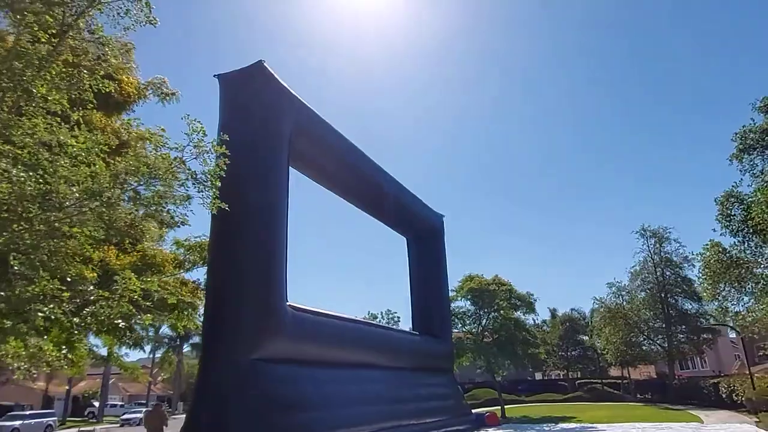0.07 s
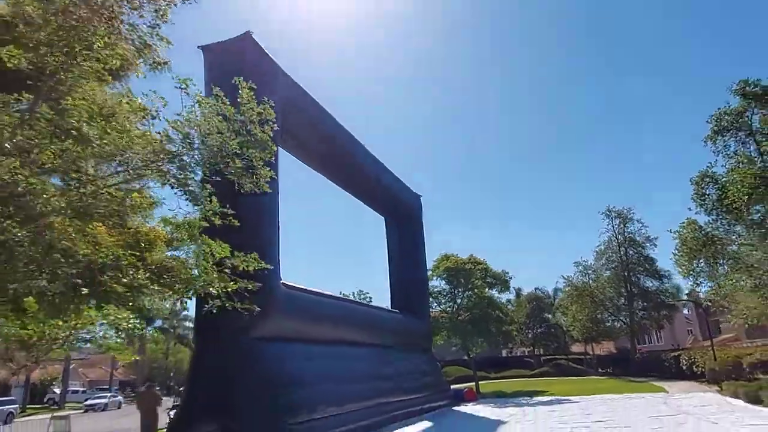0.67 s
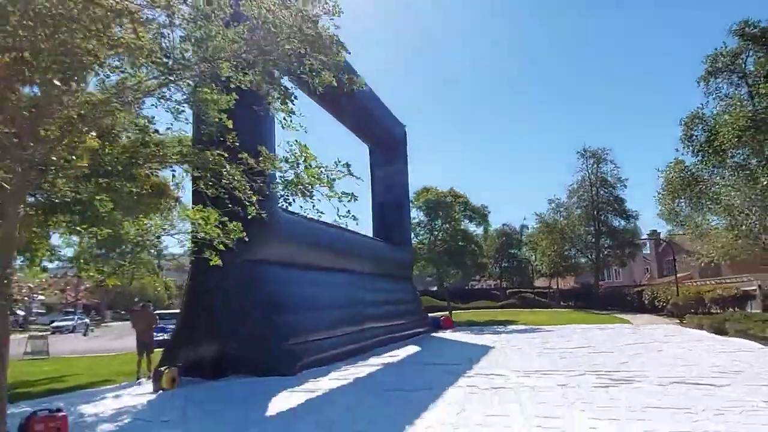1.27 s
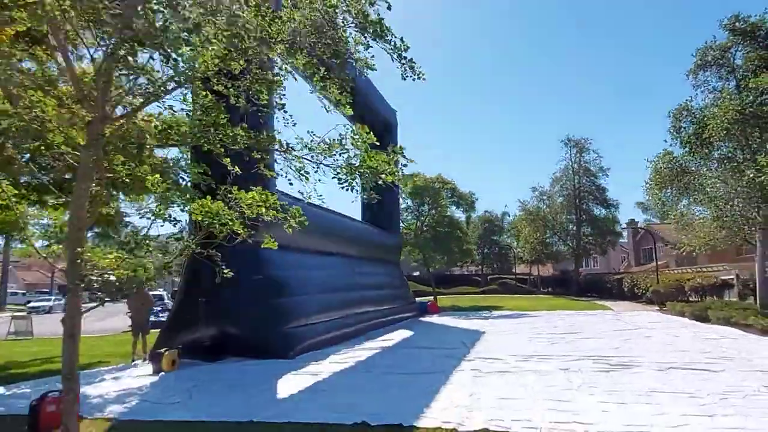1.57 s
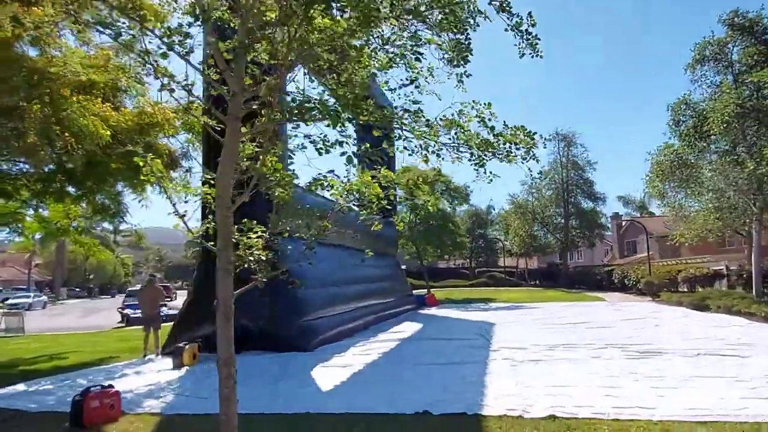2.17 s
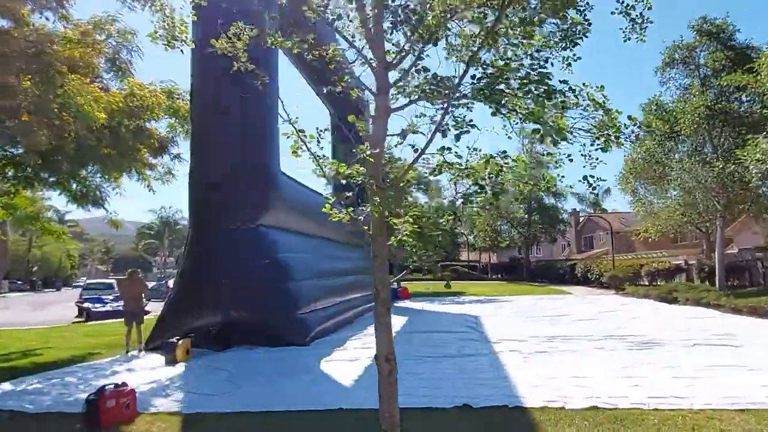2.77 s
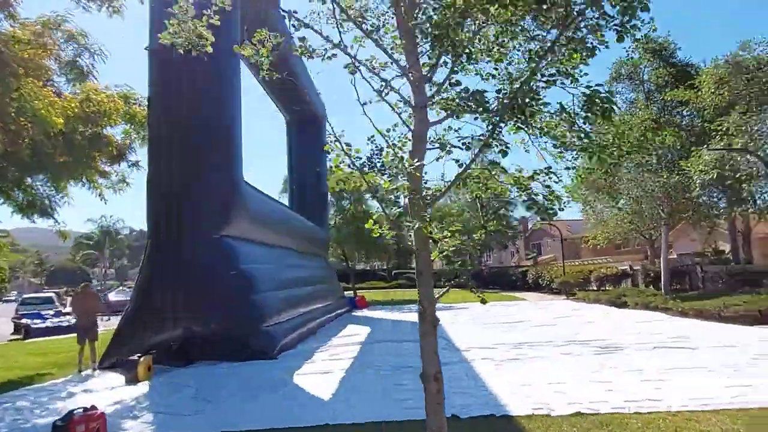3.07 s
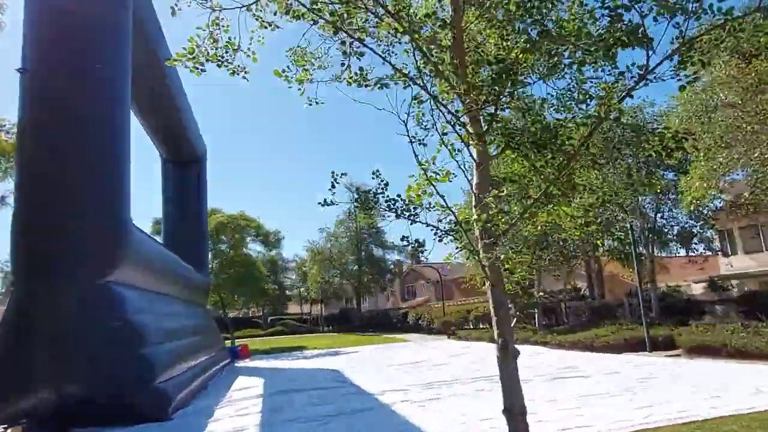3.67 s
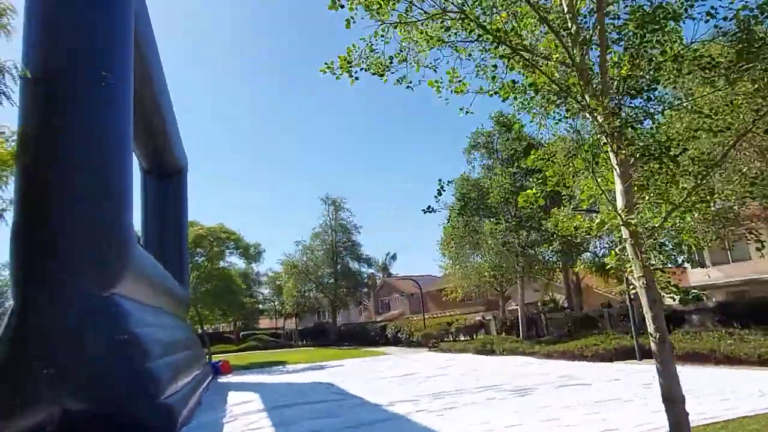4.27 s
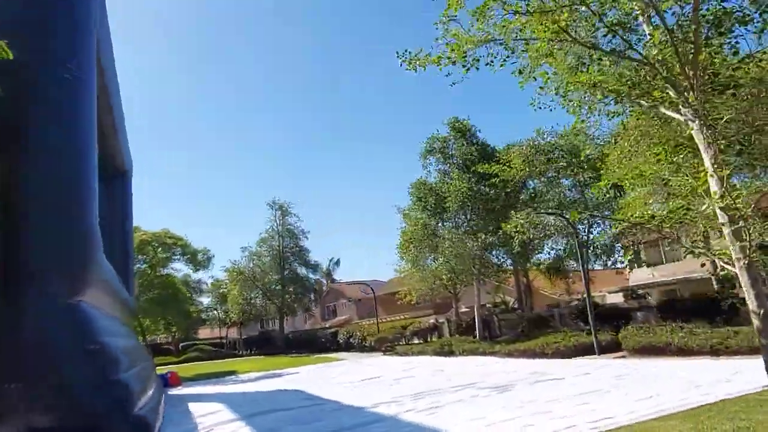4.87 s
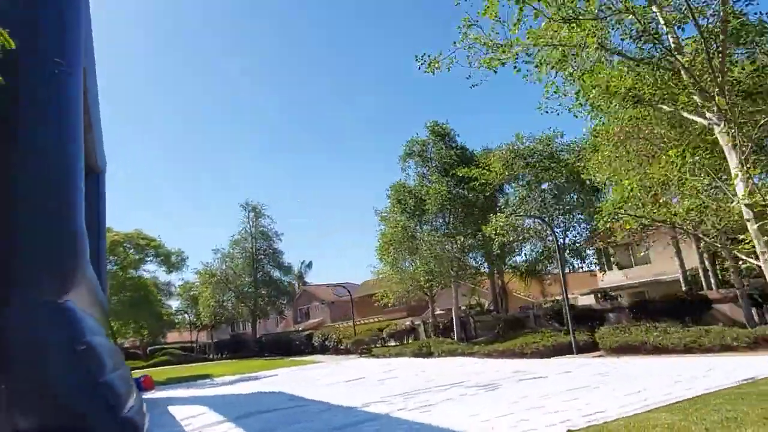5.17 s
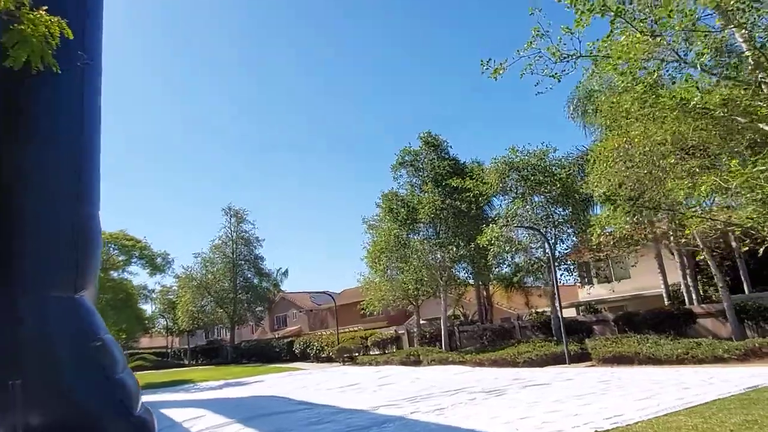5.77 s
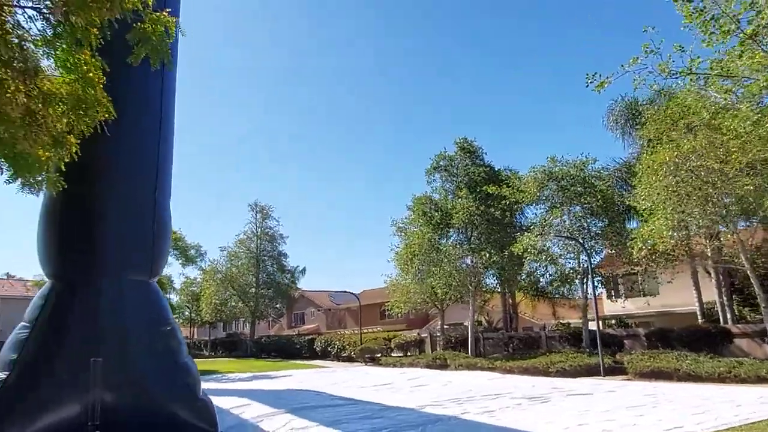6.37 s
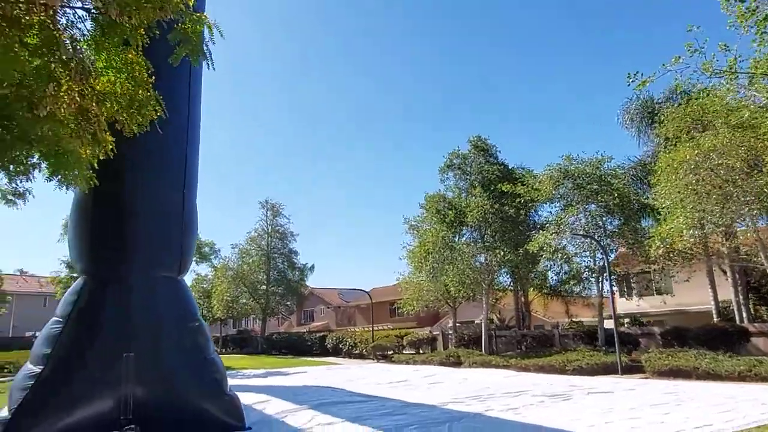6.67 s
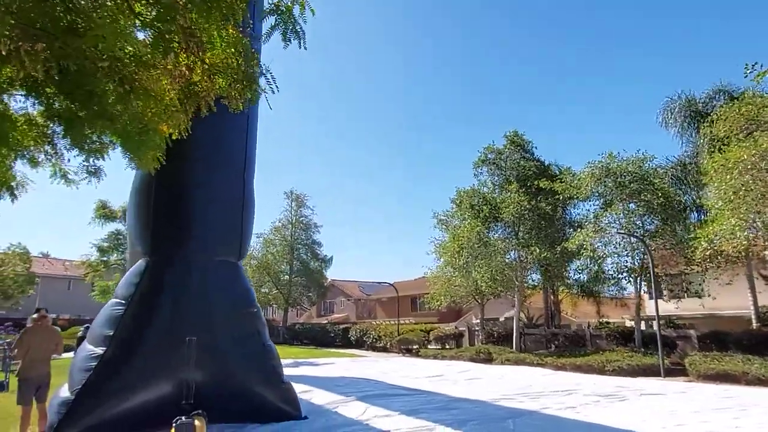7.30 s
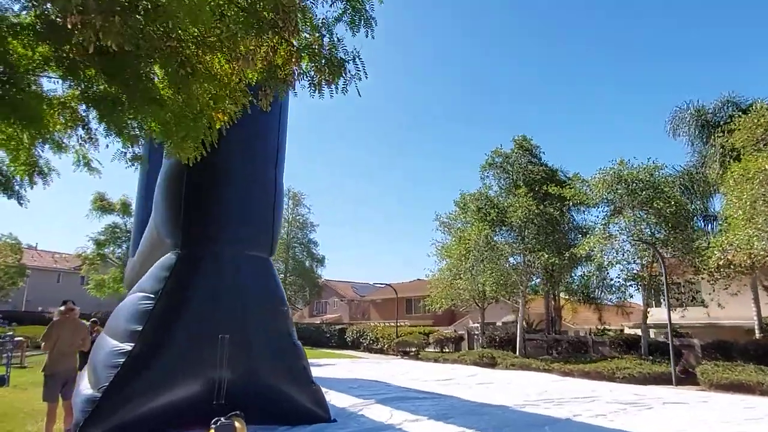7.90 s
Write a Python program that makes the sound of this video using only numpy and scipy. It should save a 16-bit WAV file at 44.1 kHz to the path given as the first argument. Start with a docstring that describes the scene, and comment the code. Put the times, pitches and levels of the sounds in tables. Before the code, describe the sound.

A small petrol generator runs outdoors for the whole eight seconds at a steady speed: a rapid, muffled exhaust thudding that merges into a low drone, with a knocking case, mechanical clatter, a fluttering whine and a thin airy hiss. Beneath it, a more distant electric blower hums and rushes softly. In the first two seconds a light breeze puffs on the microphone, and three faint, dull finger ticks come between about 1.2 and 1.7 seconds. The microphone is carried toward the generator, so the engine gradually grows louder, with a fuller low boom from around 2 seconds. The whine and clatter swell near 4 seconds, a high whistle stands out around 6, and the clatter is brightest near 7. The engine shifts from the left toward the centre late on, and turns a little duller at about 8 seconds while still running.

```python
"""Generator and blower on a lawn

A petrol generator and an electric blower keep a big inflatable screen up. The one-cylinder engine
thuds through its muffler, clatters and whines; further off, the blower's motor hums and its air rushes.
The microphone is carried past the generator, turning and coming closer. At first a breeze bumps
its two ports (the left and right openings) and fingers tick on its case."""
import sys
import numpy as np
from scipy import signal
from scipy.fft import rfft, irfft
from scipy.io import wavfile
from scipy.ndimage import uniform_filter1d, map_coordinates

SR = 44100
rng = np.random.default_rng(int(sys.argv[2]) if len(sys.argv) > 2 else 0)


def store_wav(level_fs):
    """Save 16-bit WAV to argv[1]."""
    pcm = np.round(np.clip(np.atleast_2d(level_fs), -1, 1) * 32767)
    wavfile.write(sys.argv[1], SR, pcm.T.astype(np.int16))


N = 358974
TIME = np.arange(N) / SR
HZ = np.maximum(np.fft.rfftfreq(N, 1 / SR), 1)
FIRING_HZ = 38.81   # usual firings per second; an "order" is a multiple of the firing rate


def from_db(db):
    """Turn decibels into a gain."""
    return 10 ** (np.asarray(db) / 20)


def rms_one(x):
    """Scale x so that its average strength (rms) is 1."""
    return x / np.sqrt(np.mean(x ** 2) + 1e-20)


def in_time(rows):
    """Join a table's rows with straight lines in time: one curve for each further column."""
    times, *columns = np.transpose(rows)
    return [np.interp(TIME, times, column) for column in columns]


def bump(centre_s, half_width_s):
    """A smooth rise and fall of height 1."""
    return np.exp(-((TIME - centre_s) / half_width_s) ** 2)


def drift(rate_hz):
    """A random wander of strength 1 that changes about rate_hz times a second."""
    return rms_one(irfft(rfft(rng.standard_normal(N)) / (1 + (HZ / rate_hz) ** 2), N))


def colour(x, spectrum):
    """Shape the lows and highs of x by a spectrum table; the result has strength 1."""
    hz, db = np.transpose(spectrum)
    gain = from_db(np.interp(np.log(HZ), np.log(hz), db))
    edge_fade = np.minimum(HZ / hz[0], 1) ** 2 * np.minimum(hz[-1] / HZ, 1) ** 2
    return rms_one(irfft(rfft(x) * gain * edge_fade, N))


def at_ports(x, pan_db=0, lead_scale=1):
    """Sound reaches one port before the other as the microphone turns; pan_db is left minus right."""
    # direction of the generator: (time [s], left port's lead before scaling [ms])
    bearing = [(0, .375), (2.7, .38), (3.7, .457), (4.1, .452), (4.5, .42), (5.15, .42), (5.85, .35),
               (6.5, .13), (7.15, .11), (7.6, .055), (8.14, -.04)]
    shift = lead_scale * in_time(bearing)[0] * SR / 2000   # samples, half the lead for each port
    return np.array([map_coordinates(x, [np.arange(N) + side * shift], order=3, mode="nearest")
                     * from_db(side * pan_db / 2) for side in (1, -1)])


def breeze(start_db=-34, fade_db_per_s=2, puff_half_width_s=0.031):
    """A dying wind puffs on each port a little differently, over the hush of trees and street."""
    # the distant hush: (frequency [Hz], relative level [dB])
    hush_spectrum = [(30, -20), (80, -27), (250, 8.5), (600, 6.5), (1200, 5.5), (2400, 3.5), (4000, 1.5),
                     (8000, -4.5), (12000, -21), (16000, -22)]
    # puffs on the ports: (time [s], level [dB])
    puff_peaks = [(.06, -33), (.28, -29), (.41, -34), (.52, -29), (.69, -27), (.89, -30), (1.29, -42),
                  (1.39, -35), (1.78, -29.5)]
    noise = rng.standard_normal(N) + 0.75 * rng.standard_normal((2, N))
    rumble = colour(noise, [(20, -17), (45, -7.5), (80, 0), (125, -1.5), (170, -16), (260, -27)])
    hush = from_db(-43) * colour(rng.standard_normal((2, N)), hush_spectrum)
    puffs = sum(from_db(db) * bump(s, puff_half_width_s) for s, db in puff_peaks)
    return np.hypot(puffs, from_db(start_db - fade_db_per_s * TIME)) * rumble + hush


def handling(decay_s):
    """Fingers shift on the microphone's case and make short, dull ticks."""
    # finger touches: (time [s], relative level [dB])
    ticks = [(1.17, -24.5), (1.451, -32), (1.718, -26)]
    envelope = sum(from_db(db - 4) * (TIME >= s) * np.exp(-np.abs(TIME - s) / decay_s)
                   for s, db in ticks)
    touch = rng.standard_normal(N) + rng.standard_normal((2, N))
    return envelope * colour(touch, [(300, -10), (800, 4), (1300, 1), (3000, -22)])


def blower(shaft_hz=55.65):
    """The motor hums under the rumble of air pushed into the fabric."""
    # rushing air: (frequency [Hz], relative level [dB])
    air_spectrum = [(20, -36), (45, -17), (90, -13), (130, -7.5), (155, -0.5), (182, -1), (215, -8.5),
                    (320, -8), (420, -19), (600, -15.5), (900, -33), (2000, -28.5)]
    hum = np.sqrt(2) * from_db(-47 + drift(1)) * np.sin(2 * np.pi * shaft_hz * TIME + 0.22 * drift(2.5))
    air = from_db(-36.5) * colour(rng.standard_normal(N), air_spectrum)
    nearness_db, = in_time([(0, 0.55), (4, 0.61), (8.14, 3.6)])
    return at_ports((hum + air) * from_db(nearness_db))


def whistles(width_hz):
    """Air in the narrow cooling slots makes thin, breathy notes, clearest early in the walk."""
    # slot notes: (pitch [Hz], relative level [dB])
    notes = [(9860, -61.5), (10450, -58), (10970, -60), (11530, -57.5)]
    slots = 0
    for hz, db in notes:
        band = rfft(rng.standard_normal((2, N))) / (1 + ((HZ - hz) / width_hz) ** 2)
        slots += from_db(db) * rms_one(irfft(band, N))
    gain_db, = in_time([(0, -6), (.8, 2), (1.6, -1.5), (2.6, 1), (3.5, -7.5), (8.14, -9)])
    return slots * from_db(gain_db)


def crankshaft(jitter_s, first_firing_s=0.0244):
    """Count engine cycles from the first firing; each comes a little early or late."""
    # the speed regulator wanders slightly: (time [s], firing rate [Hz])
    speed = [(0, 38.91), (1.2, 38.81), (1.7, 38.785), (2.6, 38.855), (3.6, 38.79), (4.7, 38.865),
             (5.7, 38.8), (8.14, 38.8)]
    return np.cumsum(in_time(speed)[0]) / SR + FIRING_HZ * (jitter_s * drift(5.7) - first_firing_s)


def effort(cycles, decay, valve):
    """The push in each cycle, 0-1: it jumps at the firing and as the valve shuts; decay is in cycles."""
    place = (cycles + .02) % 1
    firing = np.exp(-place / decay)
    closing = valve * np.exp(-((place - .35) % 1) / decay)
    rise_s = min(decay, .14) / FIRING_HZ   # short knocks rise fastest
    return uniform_filter1d(np.maximum(firing, closing), size=round(rise_s * SR))


def part_levels(start_m=3.05, end_m=1.127):
    """Each part's level in dB: it grows as the microphone nears and changes in the beams of sound."""
    # openings in the case beam the sound, and the walk ends in a shadow: (time [s], half-width [s],
    # casing [dB], fan housing [dB], clatter [dB], vent [dB], hiss [dB], whine [dB])
    beams = [(.75, 0.28, 0, 0.5, 2, 0.5, 2.5, -0.5), (4.15, 2.03, 5.5, 3, 5.5, 0, -1.5, 8),
             (5.9, .5, 1.5, 0, 0, 1.5, 1.5, -1), (7.2, 0.54, 1, 1, 8.5, 3.5, 2.5, 7.5),
             (8.15, 0.42, -1.5, -6.5, -2.5, -5.5, -2, -12)]
    # exhaust first, then the parts in the order above
    start_levels_db = -31, -47.5, -43.5, -50.5, -52, -46.5, -50
    nearness_shares = 0.99, 1, 0.25, 0.44, 0.92, 0.1, 0.14
    nearness_db = -20 * np.log10(1 + (end_m / start_m - 1) * TIME / TIME[-1])
    beams_db = sum(np.outer([0, *gains_db], bump(s, width_s)) for s, width_s, *gains_db in beams)
    return [db + share * nearness_db + beam_db
            for db, share, beam_db in zip(start_levels_db, nearness_shares, beams_db)]


def knocks(cycles, repeat, depth_db, decay, valve):
    """Moving parts pulse with the engine; repeat is the share of noise that is alike in every cycle."""
    pattern = rng.standard_normal(round(SR / FIRING_HZ))
    recurring = rms_one(map_coordinates(pattern, [cycles % 1 * len(pattern)], order=3, mode="grid-wrap"))
    strength = from_db(depth_db * effort(cycles, decay, valve) + 1.1 * drift(20))
    return strength * (np.sqrt(repeat) * recurring + np.sqrt(1 - repeat) * rng.standard_normal(N))


def panel(cycles, spectrum, pan_db, repeat, depth_db, decay, valve, scattered, lead_scale=1):
    """One part's knocks arrive directly, and a scattered share bounces off the ground and screen."""
    direct = at_ports(knocks(cycles, repeat, depth_db, decay, valve), pan_db, lead_scale)
    bounced = np.array([knocks(cycles, repeat / 2, depth_db, decay, valve) for side in range(2)])
    return colour(np.sqrt(1 - scattered) * direct + np.sqrt(scattered) * bounced, spectrum)


def tones(cycles, orders, waver_db, scatter=1):
    """Pure notes on the engine's orders; with little scatter they line up into a rap at each firing."""
    return sum(np.sqrt(2) * from_db(db + waver_db * drift(8.7))
               * np.sin(2 * np.pi * (round(k) * cycles + scatter * rng.random())) for k, db in orders)


def whine(cycles, level_db, flutter_db, order):
    """The strongest note of the cooling fan and alternator swells and flutters in the moving air."""
    # brief swells: (time [s], boost [dB])
    swells = [(1.44, 5), (2.32, 8), (2.799, 2), (3.78, 5), (6.35, 6), (6.85, 3)]
    swells_db = sum(db * bump(s, half_width_s=0.086) for s, db in swells)
    strength = np.sqrt(2) * from_db(level_db + swells_db + flutter_db * drift(15))
    return strength * np.sin(2 * np.pi * order * cycles + 0.54 * drift(8.4))


def buzzing_notes(cycles, housing_db, clatter_db, vent_db, whine_db):
    """The engine's high notes buzz, because the shaft is driven in jerks."""
    # notes that ring in each part: (order [x firing rate], relative level [dB])
    housing_orders = [(46, -14), (49, -17), (51, -4), (60, -14), (61, -11), (70, -14), (73, -27)]
    clatter_orders = [(90, -16), (110, -18), (112, -6), (113, -10.5)]
    vent_orders = [(128, -26.5), (132, -32)]
    notes = from_db(housing_db - 3) * tones(cycles, housing_orders, waver_db=2.4)
    notes += whine(cycles, whine_db, flutter_db=2, order=56)
    notes += from_db(clatter_db - 0.9) * tones(cycles, clatter_orders, waver_db=3)
    # the vent's whistle beams sideways, so it stands out as the microphone passes
    facing_db = -3.5 + 23.5 * bump(centre_s=6, half_width_s=2.1)
    notes += from_db(vent_db + facing_db) * tones(cycles, vent_orders, waver_db=3)
    buzz = effort(cycles, decay=0.18, valve=0.52)
    return at_ports(notes * from_db(7 * (buzz - buzz.mean())), pan_db=-5.2)


def clatter_and_cooling(cycles, housing_db, clatter_db, vent_db, hiss_db):
    """Fan housing, moving parts, vent and hissing air each give a band of pulsing noise."""
    # the four bands: (frequency [Hz], relative level [dB])
    housing_band = [(1500, -26.5), (1900, -4), (2150, -5.5), (2450, -9), (2750, -10), (3000, -16),
                    (3500, -38)]
    clatter_band = [(2400, -6), (3000, 0.5), (3450, 4), (3850, 1.5), (4350, 7.5), (4700, -0.5), (5300, -28)]
    vent_band = [(4200, -33), (4900, 4.5), (5400, 6), (6200, 6), (7500, 0), (8300, -5.5), (9500, -35)]
    hiss_band = [(7000, -4), (8200, 1.5), (8750, 4), (9600, 0), (10300, -3.5), (11400, 4), (12200, 1),
                 (13000, -1), (16000, -5.5)]
    housing = panel(cycles, housing_band, pan_db=-1.96, repeat=0.13, depth_db=11,
                    decay=0.6, valve=0.55, scattered=0.1, lead_scale=0.91)
    clatter = panel(cycles, clatter_band, pan_db=-1.2, repeat=0.18, depth_db=10.5,
                    decay=0.48, valve=0.75, scattered=0.12)
    vent = panel(cycles, vent_band, pan_db=-5.6, repeat=0.12, depth_db=13,
                 decay=0.25, valve=0.9, scattered=0.16)
    hiss = panel(cycles, hiss_band, pan_db=0.8, repeat=0.084, depth_db=10,
                 decay=0.41, valve=0.85, scattered=0.54)
    return (from_db(housing_db) * housing + from_db(clatter_db) * clatter
            + from_db(vent_db) * vent + from_db(hiss_db) * hiss)


def casing(cycles):
    """The generator's case knocks and rings with each firing."""
    # its knocks: (frequency [Hz], relative level [dB])
    spectrum = [(400, -2), (600, 2), (760, -7.5), (930, 5), (1050, -2), (1230, 2.5), (1500, 0.5),
                (1750, -6.5), (2100, -19)]
    # its ringing notes: (order [x firing rate], relative level [dB])
    orders = [(21, -15), (22, -14.5), (23, -17.5), (24, -14), (25, -12.5), (27, -26), (30, -12), (31, -21),
              (32, -15), (33, -23), (34, -20), (35, -26), (36, -18), (37, -18), (38, -19)]
    knocking = panel(cycles, spectrum, pan_db=-0.1, repeat=0.2, depth_db=12.5,
                     decay=0.05, valve=0.78, scattered=0.02, lead_scale=0.82)
    ringing = tones(cycles, orders, waver_db=1.5, scatter=0.21)
    return knocking + at_ports(ringing, pan_db=-0.4, lead_scale=0.87)


def exhaust(cycles, unevenness_db, drone_lead, pipe_order):
    """Each firing rings the muffler: the low drone swells first, then comes the sharp thud."""
    # the muffler's notes: (order [x firing rate], relative level [dB])
    muffler = [(1, -18), (2, -4.5), (3, -2), (4, -9), (5, 0.5), (6, 2), (7, -5.5), (8, -3), (9, -6.5),
               (10, -15), (11, -13.5), (12, -9.5), (13, -12), (14, -13), (15, -22.5), (16, -22.5),
               (17, -17), (18, -19.5), (19, -21.5), (20, -22.5)]
    # the muffler from changing angles:
    # (time [s], low boom [dB], tailpipe ring [dB], smear of the thud [radians per log order])
    angles = [(0, -27, 1.5, 1.7), (1.3, -10.5, 5.5, 1.7), (2.3, 1, -2, 1.5), (3.5, 2.5, 0.5, 1.4),
              (5.3, 3, 3, 1.0), (6.5, 0, -0.5, .6), (8.14, -4, -13.5, .5)]
    orders, db = np.transpose(muffler)
    orders = np.round(orders)
    boom_db, pipe_db, smear = in_time(angles)
    # like a filter, the muffler delays each note by an amount that follows from the levels
    log_gain = np.log(from_db(np.concatenate([[db[0] - 34.5], db, np.full(len(db), db[-1])])))
    mirrored = np.concatenate([log_gain, log_gain[:0:-1]])
    lag = np.imag(signal.hilbert(mirrored))[1:len(db) + 1]
    # orders up to the loudest come early by drone_lead, a share of the cycle
    lag -= 2 * np.pi * drone_lead * np.minimum(orders, orders[np.argmax(db)])
    thuds = 0
    for k, level_db, late in zip(orders, db, lag):
        beam_db = boom_db / (1 + (k / 3) ** 4) + pipe_db / (1 + (k - pipe_order) ** 2)
        # echoes from ground and screen smear the thud and shift as the microphone moves
        reflected = smear * np.log(k) + .55 * drift(.3)
        thuds -= from_db(level_db + beam_db) * np.cos(2 * np.pi * k * cycles - late - reflected)
    return rms_one(thuds) * from_db(unevenness_db * drift(14))


def generator():
    """Exhaust, casing, fan, clatter and cooling air all keep time with one crankshaft."""
    cycles = crankshaft(jitter_s=0.00003)
    exhaust_db, casing_db, housing_db, clatter_db, vent_db, hiss_db, whine_db = part_levels()
    thuds = exhaust(cycles, unevenness_db=0.44, drone_lead=0.2983, pipe_order=11.17)
    sound = at_ports(from_db(exhaust_db) * thuds, pan_db=0.9, lead_scale=0.87)
    sound += from_db(casing_db) * casing(cycles)
    sound += clatter_and_cooling(cycles, housing_db, clatter_db, vent_db, hiss_db)
    return sound + buzzing_notes(cycles, housing_db, clatter_db, vent_db, whine_db)


def scene():
    """Both machines, the open air and the finger ticks, in stereo."""
    return generator() + whistles(width_hz=33) + blower() + breeze() + handling(decay_s=0.0049)


def record(dry):
    """Cut off the very highest treble steeply."""
    cutoff_hz = 15750
    return irfft(rfft(dry) / np.sqrt(1 + (HZ / cutoff_hz) ** 800), N)


dry = scene()
out = record(dry)
store_wav(out)
```